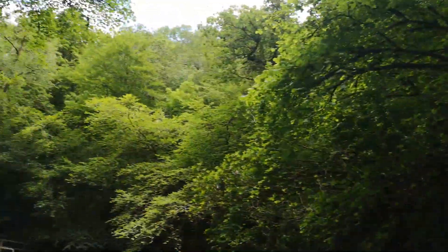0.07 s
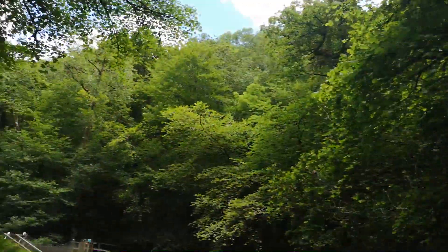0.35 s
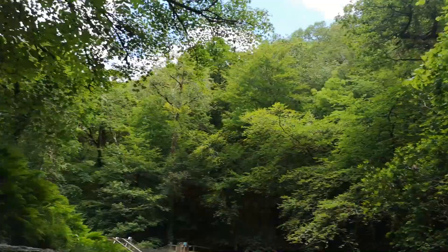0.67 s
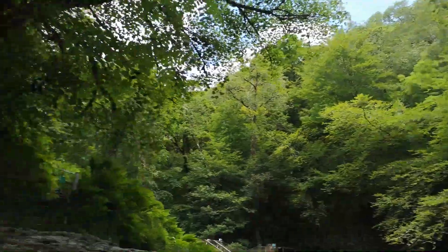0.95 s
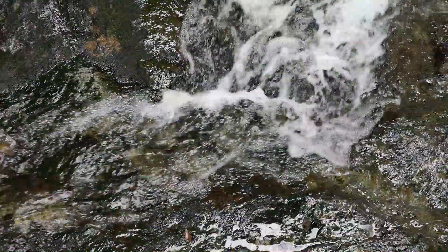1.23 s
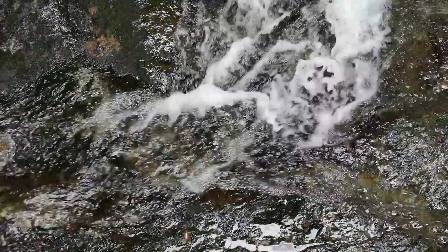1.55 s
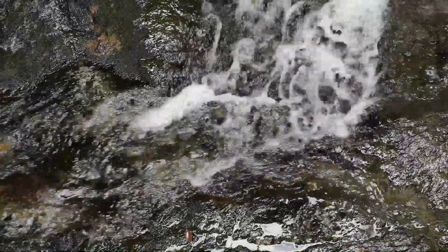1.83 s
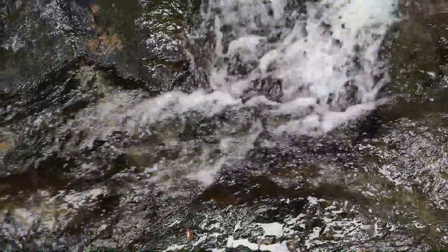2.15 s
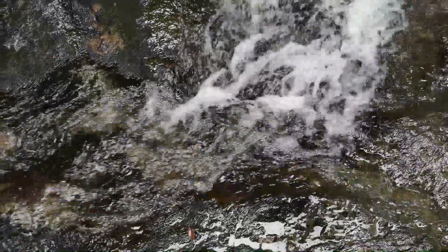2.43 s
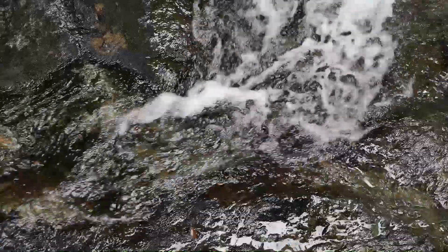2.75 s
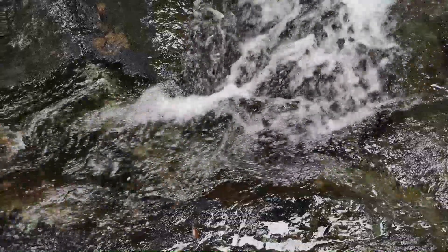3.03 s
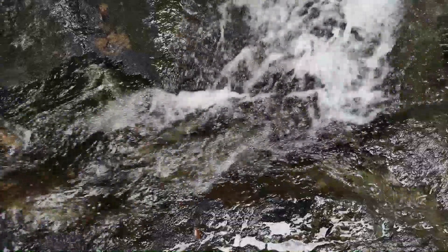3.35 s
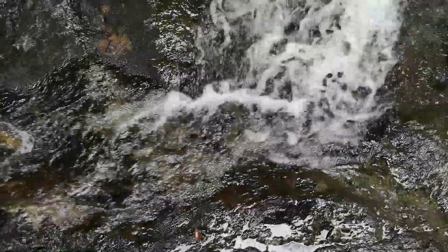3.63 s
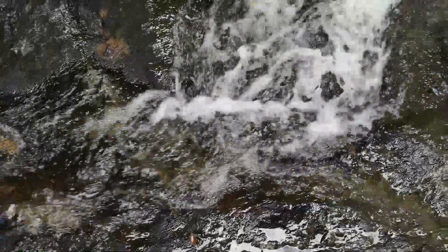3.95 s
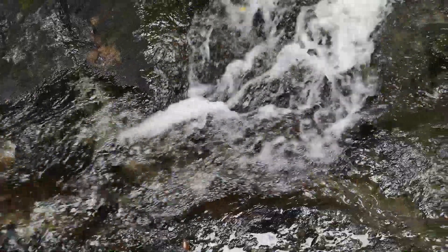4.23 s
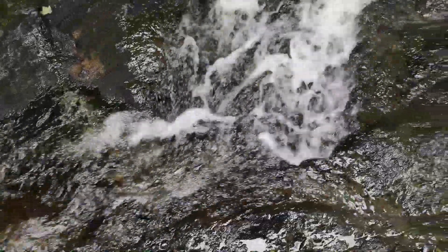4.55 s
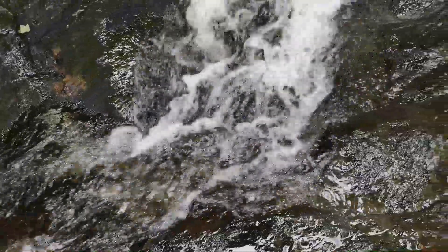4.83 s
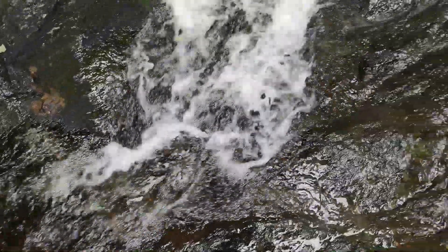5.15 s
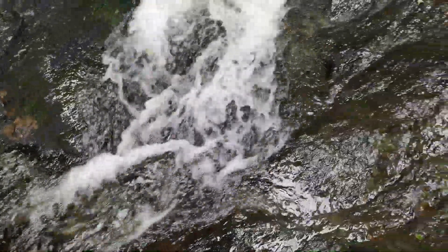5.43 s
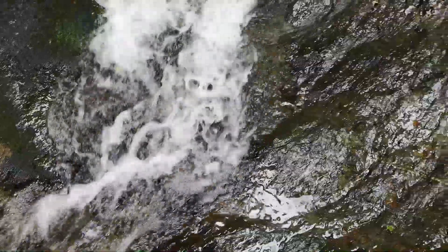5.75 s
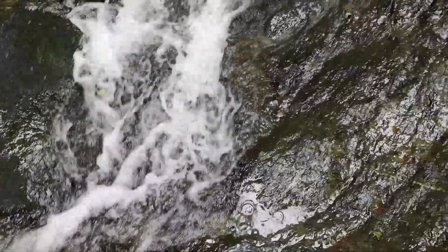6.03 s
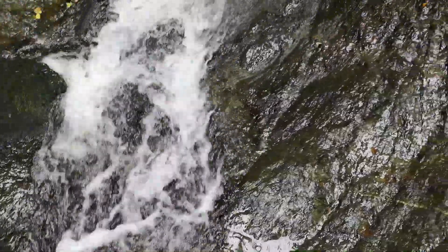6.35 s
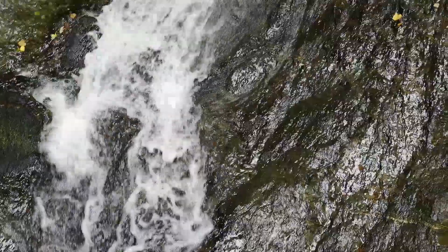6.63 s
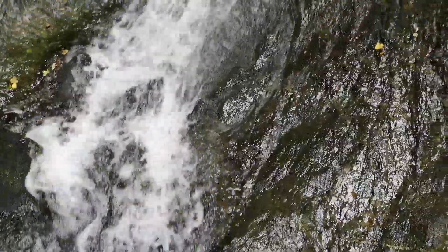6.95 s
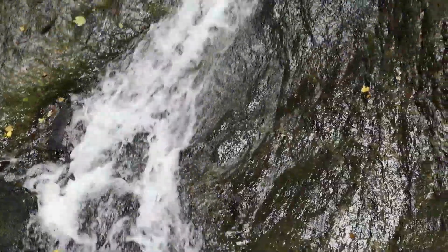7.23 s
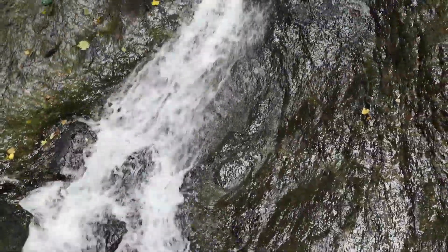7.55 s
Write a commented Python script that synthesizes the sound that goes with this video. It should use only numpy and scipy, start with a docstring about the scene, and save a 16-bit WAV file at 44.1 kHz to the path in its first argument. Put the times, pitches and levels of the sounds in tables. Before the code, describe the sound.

Heard through a hand-held stereo microphone in a gorge, a waterfall begins as a soft, distant rush. A split second of silence follows, then the fall swells in at close range and keeps pouring down the rock face, with hissing spray, pattering drops and bubbling foam, leaning a little to the right. Underneath are a light low wind rumble and a few faint handling knocks near the end.

```python
"""Waterfall in a wooded gorge

A narrow fall slides down a rock face, picked up by a hand-held stereo camera. It starts further off, to
the left; the sound drops out briefly and fades in close to the water, where the camera tilts up.
Clots of water slap the rock, drops tick and bubbles ring over the churning, and the wet rock throws it
all back. Light wind rumbles on the microphones, and there is one small tick and a few soft bumps."""
import sys
import numpy as np
from scipy import signal
from scipy.fft import rfft, irfft, next_fast_len
from scipy.io import wavfile
from scipy.ndimage import map_coordinates

SR = 44100
rng = np.random.default_rng(int(sys.argv[2]) if len(sys.argv) > 2 else 0)


def digitize_waveform(pressure):
    """Quantize a signal to 16-bit integers and store it at the path in sys.argv[1].

    Rows of a 2-D input are taken as channels; values are limited to [-1, 1].
    """
    field = np.atleast_2d(pressure).T
    bounded = np.clip(field, -1, 1)
    quanta = np.round(bounded * 32767).astype(np.int16)
    wavfile.write(sys.argv[1], SR, quanta)


N = 343098
TIME = np.arange(N) / SR
HZ = np.maximum(np.fft.rfftfreq(N, 1 / SR), 1)
BREAK_START_S, BREAK_END_S = 1.19, 1.217  # the silence between the two spots

# The water's tone, far off and close by. Each row: frequency in Hz, relative level in dB.
FAR_TONE = [(30, -91), (60, -85.7), (140, -84.5), (260, -78), (420, -77), (900, -76), (1400, -79.5),
            (2500, -81.5), (4200, -86), (6500, -89), (10000, -92.5), (15500, -91.5)]
NEAR_TONE = [(30, -86), (60, -84), (130, -81.5), (220, -75), (330, -75), (550, -71.5), (950, -71.5),
             (1500, -73.5), (3000, -74.5), (5500, -79), (10000, -81), (12500, -82), (15500, -76)]
# What the left microphone gets compared with the right. Each row: frequency in Hz, gain in dB.
FAR_LEFT_GAIN = [(30, -1), (200, -3), (450, -4.5), (1000, -7.5), (2400, -8), (3400, -15), (5000, -6),
                 (7200, -4.5), (10000, 3), (13000, 0.5), (15500, -1)]
NEAR_LEFT_GAIN = [(30, 2), (100, -2.5), (300, -5), (1000, -7.5), (2000, -8.5), (5000, -8), (9000, -5.5),
                  (13000, -0.5), (15500, -12)]
# How alike the two microphones sound. Each row: frequency in Hz, likeness from 0 to 1.
LIKENESS = [(30, .55), (90, 0.97), (250, 0.91), (600, 0.78), (1000, 0.72), (2000, 0.29), (4000, 0.1),
            (8400, 0.29), (9800, 0.92), (15500, 0.78)]
# How the small hollow in front of each microphone rings. Each row: pitch in Hz, width in Hz, boost in dB.
LEFT_PORT = [(3660, 1850, 7.5), (7000, 1700, 7), (10730, 2900, 9)]
RIGHT_PORT = [(7890, 970, 23.7)]
# Far off, the camera pans across the gorge; close by, it tilts up from the foot of the fall.
# swing_s holds the move's start and end in seconds. The other entries hold a value before and after it:
# churning, spray, extra spray on the left and airy top in dB, then the left microphone's head start
# and the echo delays of two rock faces in milliseconds.
FAR_POSE = dict(swing_s=(0.1, 1.0), churn_db=(-48, -49), spray_db=(-35.5, -37.5), spray_left_db=(1.5, 1.9),
            air_db=(0.5, 0), lead_ms=(0.34, 0.22), rock_ms=(2.5, 2.33), back_rock_ms=(3.6, 3.6))
NEAR_POSE = dict(swing_s=(3.83, 6.74), churn_db=(-44.5, -46), spray_db=(-29.5, -28.5),
             spray_left_db=(0.8, -1.3), air_db=(-0.76, 0.2), lead_ms=(0.19, -0.11), rock_ms=(1.055, 1.83),
             back_rock_ms=(2.88, 2.73))
# Gusts of wind. Each row: time of the peak in seconds, time to swell in seconds, rise in dB.
GUSTS = [(1.9, .4, 6), (4.6, .5, 6)]
# A tick, then soft bumps. Each row: start in seconds, level in dB, pitch in Hz, decay in seconds.
BUMPS = [(.6605, -22, 5300, 0.00074), (5.185, -37, 105, 0.0094), (5.211, -38, 152, 0.012),
         (5.862, -40, 95, 0.01)]


def undb(db):
    """Turn decibels into a gain."""
    return 10 ** (np.asarray(db) / 20)


def unit(x):
    """Scale a sound to an average (rms) level of 1."""
    return x / np.sqrt(np.mean(x ** 2))


def curve(points):
    """Join (Hz, value) points into a curve over all frequencies, on a log axis."""
    hz, value = np.transpose(points)
    return np.interp(np.log(HZ), np.log(hz), value)


def shape(x, response):
    """Filter a sound: turn each frequency up or down by the response."""
    size = next_fast_len(N, real=True)
    gains = np.interp(np.fft.rfftfreq(size, 1 / SR), HZ, response)
    return irfft(rfft(x, size) * gains, size)[..., :N]


def below(hz, order=2):
    """A response that keeps the lows; a higher order cuts more steeply."""
    return 1 / np.sqrt(1 + (HZ / hz) ** (2 * order))


def above(hz, order=2):
    """The matching response that keeps the highs."""
    return np.sqrt(1 - below(hz, order=order) ** 2)


def delay(x, ms):
    """Make a sound late by a changing number of milliseconds."""
    return map_coordinates(x, [np.arange(N) - ms * SR / 1000], order=3, mode="nearest")


def wander(hz):
    """A random drift of about 1 either way, changing up to about hz times a second."""
    return unit(shape(rng.standard_normal(N), below(hz)))


def camera(name):
    """One pose value over time: it eases from first to last as the camera swings at each spot."""
    def swing(pose):
        progress = np.interp(TIME, pose["swing_s"], (0, 1))
        first, last = pose[name]
        return first + (last - first) * (1 - np.cos(np.pi * progress)) / 2
    return np.where(TIME < BREAK_START_S, swing(FAR_POSE), swing(NEAR_POSE))


def churning(surge):
    """Foaming water at the foot of the fall: a rush of noise with bubbles in it."""
    paths = rng.standard_normal((3, N))  # straight, scattered left, scattered right
    paths[0] += undb(-14.5) * bubbles(low_hz=357, high_hz=2840, cycles=17.2, glide=0.23, spread_db=2)
    return rock_echo(at_microphones(*paths)) * undb(0.5 * surge)


def bubbles(low_hz, high_hz, cycles, glide, spread_db, count=5000):
    """Trapped air rings briefly, rising in pitch as it nears the surface."""
    out = np.zeros(N + SR)
    for when, pitch, size in rng.random((count, 3)):
        hz = low_hz + (high_hz - low_hz) * pitch
        life = np.linspace(0, 1, int(cycles * SR / hz))
        ring = np.sin(2 * np.pi * cycles * life * (1 + glide * life / 2)) * undb(-40 * life)
        # small bubbles spend the same energy in a shorter ring
        strength = np.sqrt(hz) * undb(-spread_db * np.log(size + .01))
        start = int(when * N)
        out[start:start + len(ring)] += strength * ring
    return unit(out[:N])


def spray(surge):
    """Fine drops hiss in bursts, bigger ones tick and tiny bubbles fizz; all swell with the stream."""
    mist = rng.standard_normal((3, N)) * splashes(per_second=1000, spread_db=2.4, length_s=.009, share=.26)
    drops = rng.standard_normal((3, N)) * unit(impacts(per_second=2000, spread_db=3.4))
    fizz = np.array([bubbles(low_hz=1500, high_hz=15000, cycles=70, glide=.04, spread_db=2.6)
                     for _ in range(3)])
    flicker = undb(.3 * np.array([wander(hz=10) for _ in range(3)]))
    paths = flicker * (mist + undb(-14) * drops + undb(-9) * fizz)
    return rock_echo(at_microphones(*paths)) * undb(.4 * surge)


def splashes(per_second, spread_db, length_s, share):
    """The spray's strength: a steady part, plus clots of water that spread quickly on the rock."""
    slap = np.hanning(int(length_s * SR)) ** 2
    bursts = signal.fftconvolve(impacts(per_second, spread_db) ** 2, slap, mode="same")
    return np.sqrt(1 - share + share * bursts / bursts.mean())


def impacts(per_second, spread_db):
    """Water hits at random moments: many small hits, a few large."""
    hits = rng.random(N) < per_second / SR
    size = np.minimum(rng.exponential(size=N), 5)
    return hits * undb(spread_db * size)


def at_microphones(straight, left, right):
    """The straight sound reaches one microphone first; the gorge scatters the rest to each separately."""
    likeness = np.clip(curve(LIKENESS), 0, .99)
    shared = shape(straight, np.sqrt(likeness))
    scattered = shape(np.array([left, right]), np.sqrt(1 - likeness))
    steered = below(3200, order=6)  # the hiss above this stays in the middle
    shared_left = delay(shape(shared, steered), -camera("lead_ms")) + shape(shared, 1 - steered)
    return np.array([shared_left, shared]) + scattered


def rock_echo(pair, slant_ms=0.044):
    """Two close rock faces echo within milliseconds, the further one upside down, colouring the water."""
    first_ms, second_ms = camera("rock_ms"), camera("back_rock_ms")
    dull = shape(pair, below(3200))
    # the later an echo comes, the weaker it is
    echoes = [0.16 / first_ms * delay(x, first_ms + side * slant_ms)
              - 0.21 / second_ms * delay(x, second_ms) for x, side in zip(dull, (1, -1))]
    return pair + np.array(echoes)


def port(rings):
    """The small hollow in front of a microphone boosts the pitches it rings at."""
    boosts = [1 + (undb(db) - 1) / (1 + 1j * (HZ / hz - hz / HZ) * hz / width) for hz, width, db in rings]
    return np.prod(boosts, axis=0)


def heard_from(churn, hiss, tone, left_gain, split_hz=1500, air_hz=10000):
    """The fall from one spot: churning fills the lows, spray the highs, and each port adds its ring."""
    water = undb(curve(tone))
    mics = [water * undb(curve(left_gain)) * port(LEFT_PORT), water * port(RIGHT_PORT)]
    lows = np.array([shape(x, below(split_hz) * mic) for x, mic in zip(churn, mics)])
    highs = np.array([shape(x, above(split_hz) * mic) for x, mic in zip(hiss, mics)])
    # the airy top opens up as the microphones turn towards the spray
    highs += (undb(camera("air_db")) - 1) * shape(highs, above(air_hz, order=8))
    highs[0] *= undb(camera("spray_left_db"))
    return (lows / np.std(lows.mean(axis=0)) * undb(camera("churn_db"))
            + highs / np.std(highs.mean(axis=0)) * undb(camera("spray_db")))


def wind(breeze_db=-70.5, rumble_hz=50):
    """Swirls of air rumble on each microphone separately and swell in the gusts."""
    gust_db = sum(rise_db * np.exp(-((TIME - when) / swell_s) ** 2) for when, swell_s, rise_db in GUSTS)
    swirls = shape(rng.standard_normal((2, N)), below(rumble_hz) * above(19))
    return unit(swirls) * undb(breeze_db + gust_db)


def bumps(left_db=-3):
    """Light knocks that die within a few cycles, a little softer on the left."""
    out = np.zeros(N)
    for start, db, hz, decay_s in BUMPS:
        age = np.maximum(TIME - start, 0)
        out += undb(db) * np.sin(2 * np.pi * hz * age) * np.exp(-np.minimum(age / decay_s, 20))
    return np.array([undb(left_db) * out, out])


def scene(fade_out_s=.013, fade_in_s=.29):
    """The distant fall, a short silence, then the fall close by."""
    surge = wander(hz=9)  # the stream comes over the lip unevenly
    churn, hiss = churning(surge), spray(surge)
    far = heard_from(churn, hiss, FAR_TONE, FAR_LEFT_GAIN)
    near = heard_from(churn, hiss, NEAR_TONE, NEAR_LEFT_GAIN)
    fade_out = np.clip((BREAK_START_S - TIME) / fade_out_s, 0, 1) ** 3
    fade_in = np.interp(TIME, (BREAK_END_S, BREAK_END_S + fade_in_s), (0.025, 1), left=0)
    return fade_out * far + fade_in * near + (fade_out + fade_in) * (wind() + bumps())


def record(dry):
    """The camera cuts off the very highest treble."""
    return shape(dry, below(15800, order=200))


dry = scene()
out = record(dry)
digitize_waveform(out)
```